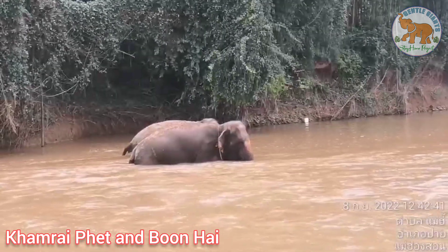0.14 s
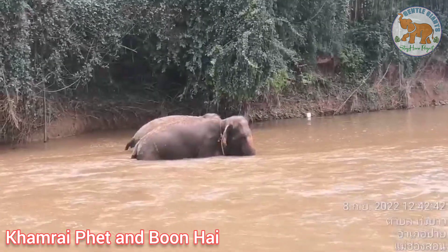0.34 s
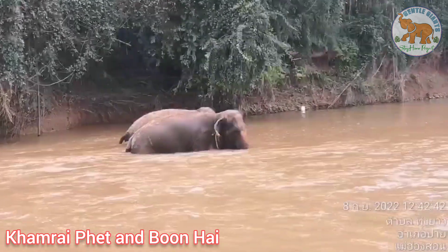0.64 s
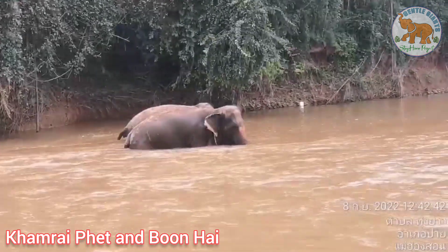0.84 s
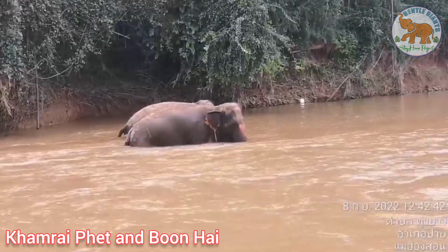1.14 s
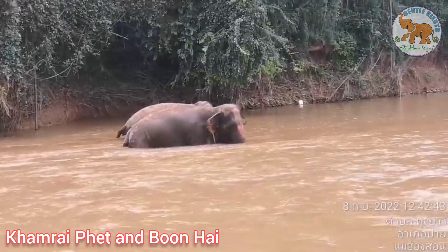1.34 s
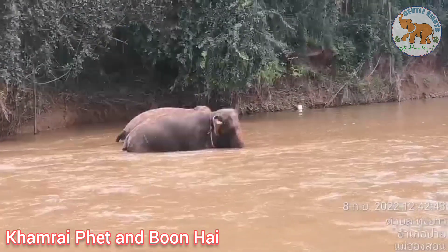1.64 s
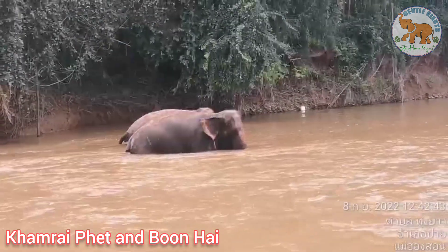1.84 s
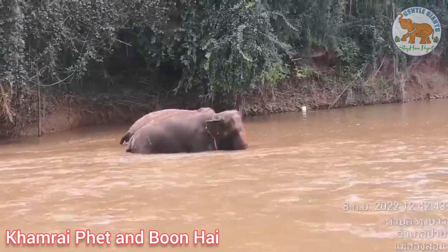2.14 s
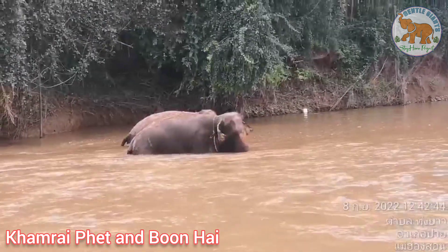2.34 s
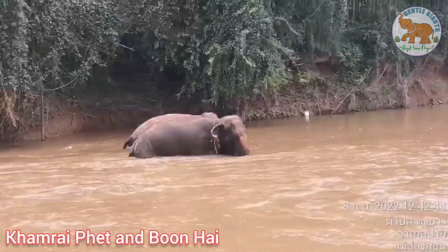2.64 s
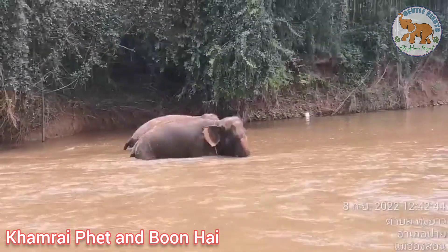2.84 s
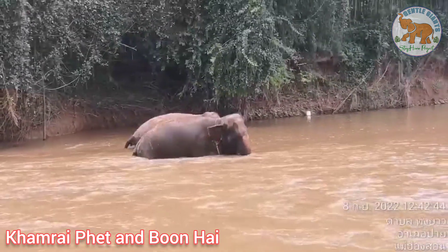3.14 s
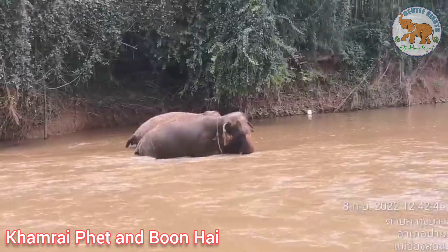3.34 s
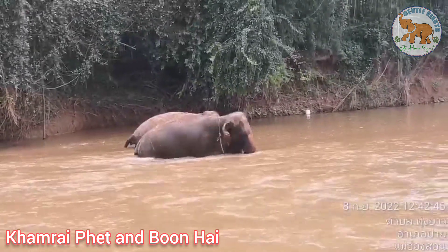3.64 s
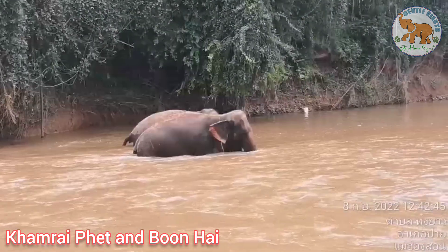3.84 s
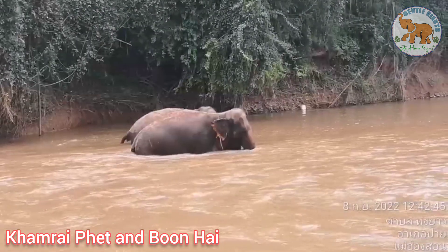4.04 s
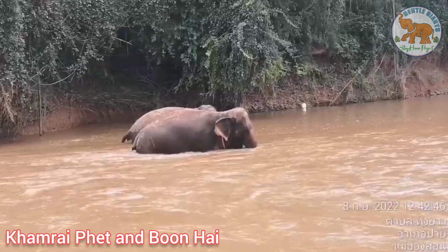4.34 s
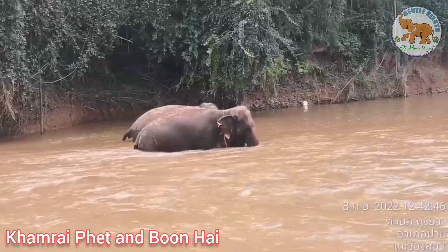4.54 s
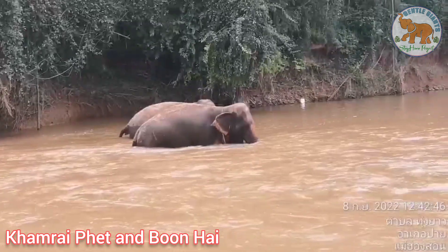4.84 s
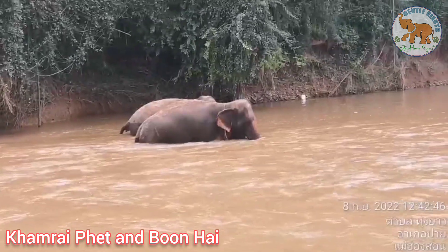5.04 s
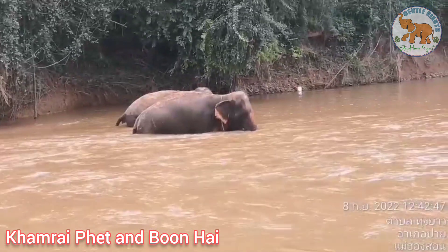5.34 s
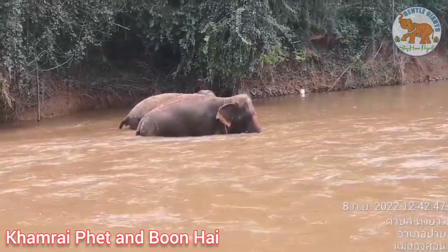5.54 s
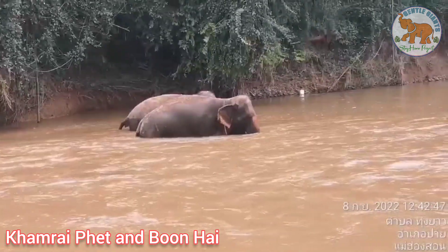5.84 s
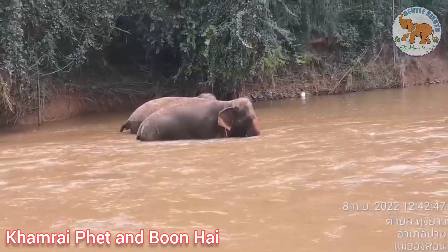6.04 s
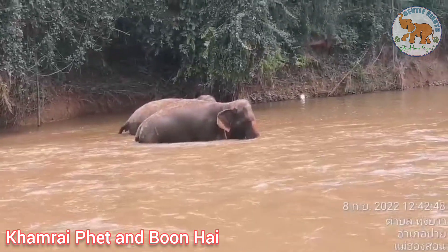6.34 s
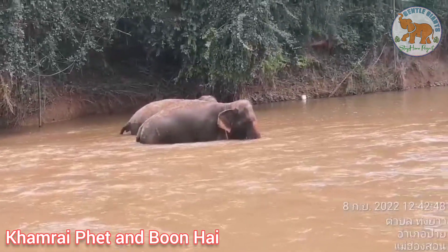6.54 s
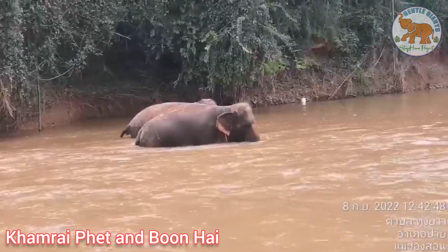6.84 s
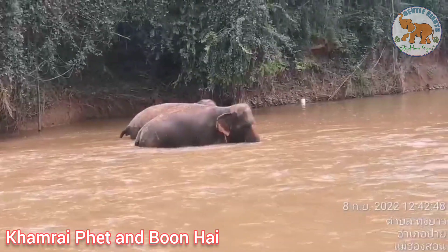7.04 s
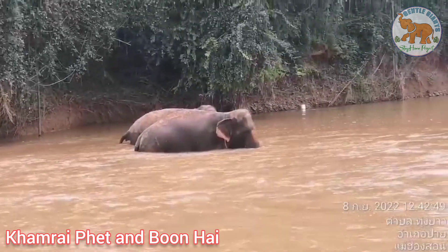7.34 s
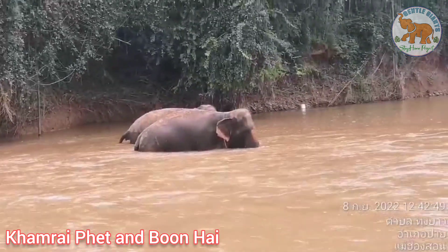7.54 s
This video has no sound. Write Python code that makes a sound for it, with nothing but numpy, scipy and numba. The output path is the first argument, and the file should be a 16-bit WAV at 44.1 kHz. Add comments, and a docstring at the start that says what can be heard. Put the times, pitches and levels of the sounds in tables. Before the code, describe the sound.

Over rushing river water and gusts on the microphone, an elephant growls, roars harshly once, and keeps growling as a second rumble joins.

```python
"""Elephant roaring in a river

From the water's edge: a wading elephant forces a slow, pulsing growl up into a rough roar with a rush
of air, then sinks back to the growl. A second, smoother rumble joins and creeps up in pitch. The wooded
bank echoes them and the river hisses and splashes. Wind buffets the two microphone ports of a phone,
the left one the more sensitive."""
import sys
import numpy as np
from scipy import signal
from scipy.fft import rfft, irfft, next_fast_len
from scipy.io import wavfile
from scipy.ndimage import uniform_filter1d
from numba import njit

SR = 44100
rng = np.random.default_rng(int(sys.argv[2]) if len(sys.argv) > 2 else 0)


def wrap_up_sound(samples):
    """Save the sound to the file named by the first command line argument, as 16-bit audio."""
    columns = np.atleast_2d(samples).T
    # keep every value between -1 and 1, then stretch to whole-number steps
    tamed = np.clip(columns, -1, 1)
    steps = np.round(tamed * 32767).astype(np.int16)
    wavfile.write(sys.argv[1], SR, steps)


N = 339570
TIME = np.arange(N) / SR


# Cavities that ring in the growl. Each row: centre in Hz before TRACT moves it, width in Hz, gain in dB.
CHEST = [(128.8, 29, 18), (199, 50, 6), (283, 40, 5)]
THROAT = [(580, 50, 0)]
LOWER_THROAT = [(302, 59, 0)]
UPPER_THROAT = [(756, 44, 3), (831.6, 15, 0.5), (1120, 360, -21.5), (1395, 63, -18), (1780, 48, -9.5)]
# They move as the elephant strains. Each row: time in seconds, then chest, throat, upper throat in Hz.
TRACT = [(1.6, 99.4, 610, 814), (1.77, 114, 576, 850), (1.9, 132.7, 624, 870), (2.05, 162, 625, 910),
         (3.05, 168.5, 656, 784), (3.2, 130, 664, 752), (3.45, 121.3, 601, 788), (4.4, 132, 628, 770),
         (7.7, 129, 634, 774)]
# Stretches of growling. Each row: start and end in seconds, opening throat level in dB, swell in dB per
# second, then chest, lower throat and upper throat in dB relative to the throat.
GROWLS = [(1.54, 2.053, -59, 25, 15.9, -20, -6.5), (3.014, 3.459, -43.5, -32.5, 12.2, 6, -4),
          (3.333, 4.066, -50.5, -20.5, 17.2, 3.5, -4), (3.98, 5.02, -57, -5, 4.8, -2.5, -7.5),
          (4.92, 7.796, -64, -0.16, 4, 2, -2)]

def growl():
    """Slack folds slap some twenty times a second, unevenly, and ring chest and throat."""
    slaps = folds(beats(), jitter=.02, shimmer_db=2, breath=.42, closing_s=.014)
    chest_hz, throat_hz, upper_hz = curves(TRACT) * (1 + .012 * walk(9))
    throat_shift = throat_hz / THROAT[0][0]
    cavities = [(THROAT, throat_shift), (CHEST, chest_hz / CHEST[0][0]),
                (LOWER_THROAT, throat_shift), (UPPER_THROAT, upper_hz / UPPER_THROAT[0][0])]
    throat, *others = (steady(resonate(slaps, modes, shift), .09) for modes, shift in cavities)
    voice = np.zeros(N)
    for start, end, db, swell_db, *others_db in GROWLS:
        gain = undb(db + swell_db * np.clip(TIME - start, 0, end - start))
        gain *= envelope(start, end, attack_s=.097, release_s=.1)
        voice += gain * (throat + undb(others_db) @ others)
    return lowpass(voice, 2200, order=4)


# The slow beat of the folds. Each row: time in seconds, pulse rate in Hz.
BEAT_RATE = [(1.6, 19), (1.7, 25), (2.08, 26), (2.22, 30), (2.3, 42), (2.8, 39), (2.97, 41), (3.2, 28),
             (3.68, 25), (3.85, 20), (4.4, 18.6), (5.9, 19.8), (7.7, 19.7)]

def beats():
    """Cycles of the slow beat of the folds, pulled into step with every knock and jolt."""
    turns = cycles(curves(BEAT_RATE)[0])
    accents = np.sort([s for s, *_ in KNOCKS + JOLTS])
    offsets = np.unwrap(np.interp(accents, TIME, turns) % 1, period=1)
    return turns - np.interp(TIME, accents, offsets)


# Hard slaps that stand out of the growl. Each row: time in seconds, peak in dB.
KNOCKS = [(1.592, -47.5), (1.644, -44), (1.687, -40.5), (1.804, -46), (1.882, -40), (1.92, -39),
          (1.999, -45), (3.117, -32.5), (3.216, -32), (3.289, -33.5), (3.478, -49), (3.674, -38.5),
          (3.758, -39), (3.802, -40), (3.854, -43), (4.102, -46.5), (4.16, -46), (4.262, -49), (4.366, -45),
          (4.528, -44), (4.799, -45.5), (4.851, -46), (4.952, -42), (5.466, -43), (5.818, -47),
          (5.973, -47), (6.878, -42), (7.242, -42.5), (7.637, -42)]
# The throat's answer to a slap. Each row: centre in Hz, width in Hz, gain in dB.
KNOCK_RING = [(304, 40, 9), (641, 113, 2), (795, 44, -26)]

def knocks():
    """Now and then the folds slap shut hard: a short, broad knock in the throat."""
    ring = resonate(signal.unit_impulse(SR // 10), KNOCK_RING)
    slaps = np.zeros(N)
    for s, db in KNOCKS:
        slaps[int(s * SR)] = undb(db)
    return signal.fftconvolve(slaps, ring / np.abs(ring).max())[:N]


# The roar's fundamental. Each row: time in seconds, pitch in Hz.
ROAR_PITCH = [(1.95, 143), (2.06, 155), (2.14, 174), (2.23, 176), (2.285, 202), (2.37, 185), (2.45, 172),
              (2.485, 188), (2.56, 180), (2.66, 179), (2.71, 189), (2.735, 172), (2.77, 184), (2.885, 186),
              (2.95, 150), (3.02, 132), (3.2, 134)]
# The effort behind it. Each row: time in seconds, level in dB.
EFFORT = [(1.95, -36), (2.04, -33), (2.1, -29), (2.29, -22), (2.39, -24.5), (2.45, -22), (2.56, -23),
          (2.68, -16.5), (2.77, -21), (2.96, -22), (3.06, -28.5), (3.2, -46)]
# The folds lock into a clearer tone. Each row: middle and length in seconds, share of roughness lost.
LOCKS = [(2.287, 0.11, 0.33), (2.55, .2, 0.52), (2.68, 0.11, 0.65), (2.824, 0.19, 0.25), (3.02, .09, 0.35)]
# The voice cracks and turns harsh. Each row: middle and length in seconds, then the rise in dB of the
# overtones, ring, rasp, edge and sizzle.
CRACKS = [(2.045, 0.13, 0.5, 28.5, 21, -5, 10.5), (2.23, 0.37, 2.5, 26, 16.7, 7, 18.5),
          (2.31, 0.11, 5, -7, 2, 0, 3), (2.39, 0.14, 1, -11, 14.7, -21, 0),
          (2.52, 0.2, 4.5, -12, 9.8, 0, -9), (2.639, 0.07, 0, 12, 3, 17, -1),
          (2.735, 0.12, -1, 22, 7.3, 10, 4), (2.83, 0.16, 6.5, 21.5, 1, 15.5, 8)]
# Brief jolts. Each row: start in seconds, rise in dB, further rise of the high resonances in dB.
JOLTS = [(2.038, 5, 2.5), (2.077, -5, 1), (2.216, 3.5, 0), (2.25, 1.5, 3.5), (2.272, 2.5, 1), (2.295, 2, 4),
         (2.355, 1, 1), (2.395, 0.5, 2), (2.474, 2.5, 14.5), (2.522, 1.5, 7), (2.637, 1, 5),
         (2.729, -8.5, 16.5), (2.771, -0.5, 2.5), (2.832, -1, 3.5), (2.888, 2.5, 1), (2.941, 1.5, -5),
         (2.964, 4, -5)]
ROAR_START_S, ROAR_END_S, DULLS_FROM_S, JOLT_S = 1.93, 3.2, 2.8, .018
ROUGHNESS, BEAT_FALL_DB = .833, 7.5  # 0-1 while unlocked; fall within a beat at full roughness
OVERTONE_FADE_DB_PER_S, DULL_DB_PER_S = 6, 14

def roar():
    """Driven hard, the folds swing between a clear tone and chaotic slapping."""
    hz = curves(ROAR_PITCH)[0] * (1 + .013 * walk(22))
    lock = sum(share * swell(s, length) for s, length, share in LOCKS)
    rough = np.clip(ROUGHNESS * (1 - lock), .05, .98)
    clear = np.sqrt(1 - rough ** 2)
    phase = 2 * np.pi * cycles(hz * (1 + .055 * rough * walk(130)))
    flutter = undb(1.2 * rough * walk(110))
    low_tone = clear * steady(flutter * np.sin(2 * phase), .033)
    high_tone = clear * steady(flutter * (np.sin(3 * phase) + np.sin(4 * phase)), .023)
    under = undertone(rough)
    slaps = folds(cycles(.55 * hz), jitter=.22, shimmer_db=3, breath=.98, closing_s=.0067)
    crack_db = sum(np.outer(rises, swell(s, length)) for s, length, *rises in CRACKS)
    overtones_db, *highs_db = crack_db - DULL_DB_PER_S * np.maximum(TIME - DULLS_FROM_S, 0)
    # the overtones fade as the breath runs out and as the folds lock
    overtones_db -= 8.5 + OVERTONE_FADE_DB_PER_S * np.maximum(TIME - ROAR_START_S, 0) + 7.5 * lock
    body = roar_body(low_tone, slaps, rough, hz)
    overtones = undb(overtones_db) * roar_overtones(high_tone, slaps, rough)
    rasp = roar_rasp(slaps, highs_db)
    # the growl's slow beat goes on underneath: each beat starts a burst that dies away
    beat = (beats() + .06 * walk(40)) % 1
    jolt_db, bark_db = sum(np.outer(rises, swell(s + JOLT_S / 2, JOLT_S)) for s, *rises in JOLTS)
    bursts = undb(BEAT_FALL_DB * rough * uniform_filter1d(.45 - beat, size=130) + jolt_db)
    gain = undb(curves(EFFORT)[0]) * envelope(ROAR_START_S, ROAR_END_S, attack_s=.088, release_s=.088)
    return gain * bursts * (body + under + overtones + undb(bark_db) * rasp)


# The roar's low resonances. Each row: centre in Hz at a pitch of 186 Hz, width in Hz, gain in dB.
BODY = [(223, 40, -0.5), (283, 43, 3), (349, 36, 5), (432.7, 25, 1)]

def roar_body(tone, slaps, rough, hz):
    """The second partial, with slaps ringing low resonances that sink as the effort drops."""
    ringing = steady(resonate(slaps, BODY, shift=(hz / 186) ** .627), .1)
    return steady(tone + .75 * rough * ringing, .02)


# The spectrum of the rough overtones. Each row: frequency in Hz, gain in dB.
OVERTONE_COLOUR = [(350, -68.5), (490, -33.5), (545, 4), (595, 6), (670, 1.5), (760, -6.5), (830, -2),
                   (910, -19.5), (1010, -8), (1080, -30), (1150, -27), (2000, -103.5)]
# The mouth's resonance. Each row: time in seconds, centre in Hz.
MOUTH = [(2.2, 549), (2.33, 565), (2.42, 704), (2.5, 744), (2.59, 710), (2.64, 604), (2.72, 590),
         (2.8, 679), (3.1, 637)]

def roar_overtones(tone, slaps, rough):
    """The third and fourth partials and the slaps, lifted where the mouth resonates."""
    source = .99 * tone + np.sqrt(rough) * steady(colour(slaps, OVERTONE_COLOUR), .038)
    return steady(source + 2.95 * band(source, curves(MOUTH)[0], width=23.), .1)


# The roar's high resonances. Each row: centre in Hz, width in Hz, gain in dB.
RING = [(995, 59, 0)]
RASP = [(1327, 83, 12), (1360, 50, 7.5)]
EDGE = [(2220, 130, 1), (2757, 130, 8.3), (3600, 135, 7.1)]
SIZZLE = [(1897, 155, 4), (2886, 104, 5.5), (4570, 1450, -5.5)]
RING_DB, RASP_DB, EDGE_DB, SIZZLE_DB = -48, -44, -47.5, -47  # relative to the body, between cracks

def roar_rasp(slaps, rises_db):
    """High resonances, driven mostly by turbulence, flare when the voice cracks."""
    turbulence = steady(slaps, .11) + 1.95 * rng.standard_normal(N)
    highs = [(RING, RING_DB), (RASP, RASP_DB), (EDGE, EDGE_DB), (SIZZLE, SIZZLE_DB)]
    rasp = sum(undb(db + rise_db) * steady(resonate(turbulence, modes, 1 + .012 * walk(13)), .085)
               for (modes, db), rise_db in zip(highs, rises_db))
    return patchy(rasp, db=2.8, size=2048)


# The tone under the roar. Each row: time in seconds, pitch in Hz, level in dB relative to the body.
UNDERTONE = [(1.95, 145, -2), (2.1, 160.2, -12.5), (2.27, 170.9, -15), (2.47, 214.3, -13),
             (2.55, 202.9, -7), (2.66, 210.2, -16), (2.82, 185, -15.5), (2.95, 199.6, -12),
             (3.1, 136.8, -9)]

def undertone(rough):
    """A second, lower oscillation of the folds, less steady the rougher the roar."""
    hz, db = curves(UNDERTONE)
    gain = np.sqrt(2) * undb(db + 2.5 * walk(45))
    return gain * np.sin(2 * np.pi * cycles(hz * (1 + .09 * rough * walk(110))))


# The spectrum of the breath. Each row: frequency in Hz, gain in dB.
AIR_COLOUR = [(1200, -11), (2200, -9.5), (3300, -9), (4500, -6.5), (5500, -14.5), (6700, -3), (7900, -13.5),
              (8900, 0), (9500, -3.5), (10000, 7), (10700, 2.5), (11500, -12), (12700, -7), (15200, -21.5)]
# Surges as the roar opens and gives way. Each row: middle and length in seconds, rise in dB.
AIR_SURGES = [(2.239, 0.11, 5.5), (2.357, 0.42, 3), (3.043, 0.29, 4.5)]
AIR_DB, AIR_FULL_S, AIR_EASES_S, AIR_SLOPE_DB_PER_S = -48, 2.416, 3.05, 17.5

def rush_of_air():
    """Turbulent air swells with the roar and dies away, pulsing with the beat of the folds."""
    hiss = colour(rng.standard_normal((2, N)) * undb(2 * walk(150) + .092 * walk(24.7)), AIR_COLOUR)
    hiss = patchy(hiss, db=3.2, size=1024)
    fade_db = AIR_SLOPE_DB_PER_S * np.abs(TIME - np.clip(TIME, AIR_FULL_S, AIR_EASES_S))
    surge_db = sum(rise * swell(s, length) for s, length, rise in AIR_SURGES)
    pulse_db = 1.5 * (.5 - beats() % 1)
    onset = np.clip((TIME - GROWLS[0][0]) / .25, 0, 1)
    return ports(hiss, left_db=10.7) * undb(AIR_DB - fade_db + surge_db + pulse_db) * onset


# The second voice. Each row: time in seconds, pulse rate in Hz.
RUMBLE_RATE = [(4.3, 23.2), (4.55, 23.55), (4.75, 23.75), (5.0, 24.25), (5.45, 24.7), (6.0, 24.95),
               (6.5, 25.35), (7.0, 25.6), (7.4, 25.9), (7.7, 26.05)]
# Its partials from the third upward, each a level in dB.
RUMBLE_PARTIALS_DB = [-8, -7, -4, -6, -11.5, -9.5, -13.5, -23, -19, -24.5, -24]
# A nasal resonance moves over them. Each row: time in seconds, centre in Hz, lift in dB.
NASAL = [(4.75, 205, 0), (5.05, 208, 6.5), (5.6, 205, .5), (6.0, 274, 0), (6.3, 276, 3), (7.7, 284, 3)]
# Resonances of its air, rasp and roughness. Each row: centre in Hz, width in Hz, gain in dB.
RUMBLE_AIR = [(663, 44, 5), (754, 36, 1.5), (842, 48, 6.5)]
RUMBLE_RASP = [(2160, 98, 0)]
RUMBLE_ROUGH = [(124.6, 57, 2), (216, 43, -9.5), (304.5, 39, -10)]
RUMBLE_START_S, RUMBLE_ATTACK_S, RUMBLE_DB, RUMBLE_SWELL_DB_PER_S = 4.266, .26, -43.5, 1.6
BRIGHT_ABOVE_HZ, BRIGHT_DB, BRIGHT_S, NASAL_WIDTH_HZ = 245, 9.5, 1.25, 22

def rumble():
    """A low, nasal voice of wavering partials opens brightly; air pulses through its upper resonances."""
    age = np.maximum(TIME - RUMBLE_START_S, 0)
    hz = curves(RUMBLE_RATE)[0] * (1 + .002 * walk(6) + .0026 * walk(22))
    nasal_hz, nasal_db = curves(NASAL)
    turns = cycles(hz)
    bright_db = BRIGHT_DB * np.maximum(1 - age / BRIGHT_S, 0)
    voice = np.zeros(N)
    for k, db in enumerate(RUMBLE_PARTIALS_DB, start=3):
        waver_db = 1.7 * walk(4) + 2 * walk(14)
        phase = 2 * np.pi * k * turns + .8 * rng.standard_normal()
        lift_db = nasal_db * np.exp(-((k * hz - nasal_hz) / NASAL_WIDTH_HZ) ** 2)
        lift_db += bright_db * (k * hz[0] > BRIGHT_ABOVE_HZ)
        voice += np.sqrt(2) * undb(db + waver_db + lift_db) * np.sin(phase)
    puffs = folds(turns, jitter=.06, shimmer_db=2, breath=2.4, closing_s=.008)
    voice += undb(-6.5) * steady(resonate(puffs, RUMBLE_ROUGH), .3)
    air = sum(undb(db + 1.8 * walk(12)) * steady(resonate(puffs, modes), .3)
              for modes, db in [(RUMBLE_AIR, -67.5), (RUMBLE_RASP, -76)])
    swell_db = RUMBLE_SWELL_DB_PER_S * age
    voice *= undb(RUMBLE_DB + swell_db) * np.minimum(age / RUMBLE_ATTACK_S, 1)
    return voice + air * undb(.5 * swell_db) * np.minimum(age, 1)  # the air takes a second to come in


def bank_echo(x, t60, wet_db):
    """The call plus dull echoes scattered by the bank and its trees, partly different at each port."""
    t = TIME[:SR]
    scatter = rng.standard_normal(SR) + .087 * rng.standard_normal((2, SR))
    tail = scatter * undb(-60 * t / t60) * np.clip(t / .028, 0, 1)
    tail /= np.sqrt(np.sum(tail ** 2, axis=1, keepdims=True))
    echo = signal.fftconvolve(x[None], lowpass(tail, 2500, order=1), axes=1)[:, :N]
    return (x + undb(wet_db) * echo) / np.hypot(1, undb(wet_db))


# The river's spectrum at the microphone. Each row: frequency in Hz, gain in dB.
RIVER_COLOUR = [(100, 21), (400, 7.5), (850, 9.5), (1200, 5), (1500, 5), (2000, 7), (2600, 1), (3300, -2),
                (4600, -0.5), (6700, -1), (8000, -1), (10200, 6), (11800, -2.5), (15200, -7)]
RIVER_DB, RIVER_SWELL_DB_PER_S, POPS_PER_S = -58, .24, 500

def river():
    """A restless wash of water with countless tiny bursting bubbles in it."""
    wash = colour(rng.standard_normal((2, N)) * undb(1.85 * walk(45)), RIVER_COLOUR)
    wash = patchy(wash, db=2.6, size=1024)
    pops = (rng.random((2, N)) < POPS_PER_S / SR) * rng.standard_normal((2, N))
    pops *= undb(3 * np.minimum(rng.exponential(size=(2, N)), 3))
    water = wash + undb(-5.5) * colour(pops, RIVER_COLOUR)
    return ports(water, left_db=8) * undb(RIVER_DB + RIVER_SWELL_DB_PER_S * TIME)


# Splashes and drips. Each row: start in seconds, level in dB, centre in Hz, decay in seconds.
SPLASHES = [(.085, -47, 9300, 0.022), (0.281, -58, 6000, 0.022), (.715, -62, 5900, 0.016),
            (.81, -61, 5670, 0.025), (1.2, -52.5, 10100, 0.03), (1.501, -44, 10000, 0.0018),
            (4.69, -51, 7400, 0.0048), (4.801, -50.5, 10500, 0.0066), (5.517, -46, 8000, 0.005),
            (5.723, -47, 9600, 0.003), (5.789, -52.5, 6340, 0.025), (6.109, -56.5, 6640, 0.027),
            (6.469, -50, 10700, .008), (6.807, -44, 9900, 0.0024), (6.991, -54, 6750, 0.058),
            (7.033, -46, 9800, 0.0043), (7.469, -48.5, 6800, 0.027)]

def splashes():
    """Wavelets break: short, grainy bursts of spray."""
    out = np.zeros((2, N))
    size = SR // 5
    t = TIME[:size]
    for s, db, hz, decay in SPLASHES:
        start = int(s * SR)
        gain = undb(db) * np.exp(-t / decay) * (1 - np.exp(-8 * t / decay))
        for side in range(2):
            spray = resonate(rng.standard_normal(size) ** 3, [(hz, .3 * hz, 0)])
            out[side, start:start + size] += (gain * spray / spray.std())[:N - start]
    return ports(out, LEFT_DB)


# Two water plops and one bird's chirp. Each row: start in seconds, level in dB, opening pitch in Hz, decay in
# seconds.
PLOPS_AND_CHIRP = [(4.603, -50, 1100, 0.0058), (5.901, -58, 2380, 0.025), (6.996, -39, 920, 0.0062)]

def plops_and_chirp():
    """Short tones ring briefly and rise in pitch: two plops on the water and, near 5.9 s, a bird's chirp."""
    out = np.zeros(N)
    for s, db, hz, decay in PLOPS_AND_CHIRP:
        t = np.clip(TIME - s, 0, 20 * decay)
        gain = undb(db) * np.exp(-t / decay) * (1 - np.exp(-t / .0012))
        out += gain * np.sin(2 * np.pi * hz * t * (1 + .015 * t / decay))
    return ports(out, LEFT_DB)


# The spectrum of large eddies right at the microphone. Each row: frequency in Hz, gain in dB.
WIND_COLOUR = [(8, -22), (20, 0.5), (42, 4), (70, -0.5), (110, -5), (165, -21.5), (240, -35), (380, -48),
               (800, -71), (2000, -105), (8000, -130)]
# Gusts. Each row: middle and length in seconds, level in dB, left minus right in dB.
GUSTS = [(0.08, 0.18, -36.5, 24), (0.304, 0.21, -33, 19), (0.5, 0.51, -40, 21), (0.98, 0.33, -37.5, 11.5),
         (1.194, 0.14, -34, 6.5), (1.375, 0.22, -32, 13.5), (1.725, 0.64, -36.5, 11.5),
         (2.076, 0.3, -36.5, 21), (2.528, 0.11, -34, 20), (3.045, 0.13, -28, 10.5), (3.29, 0.45, -33, 19),
         (3.603, 0.51, -37, 6), (4.274, 0.073, -32, 13), (4.45, 0.1, -33, -2), (4.648, 0.44, -30.5, 13),
         (5.243, 0.25, -33, 6), (5.54, 0.16, -33, 7), (6.26, 0.45, -31.5, 14), (6.557, 0.97, -31.5, -0.5),
         (6.777, 0.11, -26, 6.5), (7.038, 0.15, -26, 9), (7.227, 0.1, -24, -1.5), (7.407, 0.21, -22, 7),
         (7.624, 0.23, -32.5, -14)]
BREEZE_DB, SMALL_EDDY_PITCH_RATIO, SMALL_EDDY_TAKEOVER_DB = -41, 1.586, (-34.5, -21)

def wind():
    """Eddies press on each port separately; strong wind breaks into smaller, higher-pitched ones."""
    # between gusts the breeze freshens and turns toward the right port
    breeze = ports(undb(BREEZE_DB + .5 * TIME + 2.44 * walk(5.3)), left_db=15 - 1.5 * TIME)
    power = breeze ** 2 + sum(ports(undb(db) * swell(s, length), left_db) ** 2
                              for s, length, db, left_db in GUSTS)
    eddies = []
    for ratio in (1, SMALL_EDDY_PITCH_RATIO):
        pressure = rng.standard_normal((2, N)) * undb(2.5 * walk(30))
        eddies.append(steady(colour(pressure, [(hz * ratio, db) for hz, db in WIND_COLOUR]), .15))
    large, small = eddies
    small_share = np.interp(10 * np.log10(power), SMALL_EDDY_TAKEOVER_DB, [0, 1])
    return large * np.sqrt(power * (1 - small_share)) + small * np.sqrt(power * small_share)


# Sharp hits of wind. Each row: start in seconds, level in dB, rise time in seconds.
BUFFETS = [(0.272, -27, .0018), (1.177, -29, .002), (3.599, -25, .002), (4.575, -25, .0025),
           (5.324, -26, .0021), (6.461, -23, .0009), (6.72, -23.5, .0013), (6.776, -26, .002),
           (7.024, -24, .001), (7.425, -20, .0014), (7.66, -24, .0012)]

def buffets():
    """Now and then an eddy hits the microphone with a thump, mostly on the left."""
    thumps = np.zeros(N)
    for s, db, rise in BUFFETS:
        progress = np.clip((TIME - s) / rise, 0, 60)
        thumps += undb(db) * progress * np.exp(1 - progress)
    return ports(lowpass(thumps, 530, order=4), left_db=15)


def folds(turns, jitter, shimmer_db, breath, closing_s):
    """Vocal folds: one uneven pulse a cycle, each followed by a puff of turbulence."""
    count = int(turns[-1])
    timing, strength = rng.standard_normal((count, 2)).T
    at = np.interp(np.arange(count) + jitter * timing, turns, np.arange(N)).astype(int)
    pulses = np.zeros(N)
    pulses[at] = undb(shimmer_db * strength)
    pole = np.exp(-1 / (closing_s * SR))
    puffs = signal.lfilter([np.sqrt(1 - pole ** 2)], [1, -pole], pulses)
    return pulses + breath * puffs * rng.standard_normal(N)


def ports(x, left_db):
    """Share a sound between the two microphone ports, keeping their mean."""
    ratio = undb(left_db) * np.ones(N)
    return x * 2 * np.array([ratio, np.ones(N)]) / (1 + ratio)


def resonate(x, modes, shift=1):
    """Steep resonances (Hz, width in Hz, dB), their centres multiplied by shift."""
    shift = shift * np.ones(len(x))
    return sum(undb(db) * band(band(x, hz * shift, float(width)), hz * shift, float(width))
               for hz, width, db in modes)


@njit
def band(x, hz, width):
    """State-variable band-pass with a moving centre."""
    y, band_state, low_state = np.empty(len(x)), 0., 0.
    for i in range(len(x)):
        g, damping = np.tan(np.pi * hz[i] / SR), width / hz[i]
        v = (band_state + g * (x[i] - low_state)) / (1 + g * (g + damping))
        band_state, low_state = 2 * v - band_state, low_state + 2 * g * v
        y[i] = damping * v
    return y


def colour(x, points):
    """Causal filter through (Hz, dB) points; the result has unit rms."""
    hz, db = np.transpose(points)
    size = next_fast_len(N + SR // 2)
    size += size % 2
    f = np.maximum(np.fft.rfftfreq(size, 1 / SR), 1)
    cepstrum = irfft(np.log(undb(np.interp(np.log(f), np.log(hz), db))))
    cepstrum[1:size // 2] *= 2  # folded for minimum phase
    cepstrum[size // 2 + 1:] = 0
    y = irfft(rfft(x, size) * np.exp(rfft(cepstrum)))[..., :N]
    return y / y.std()


def lowpass(x, hz, order):
    """Roll off the treble above hz."""
    return signal.sosfilt(signal.butter(order, hz, fs=SR, output="sos"), x)


def patchy(x, db, size):
    """Let every narrow band swell and fade on its own, in frames of size samples."""
    frames = signal.stft(x, nperseg=size)[2]
    drift = uniform_filter1d(rng.standard_normal(frames.shape), size=5, axis=-2)
    drift = uniform_filter1d(drift, size=3, axis=-1)
    return signal.istft(frames * undb(db * drift / drift.std()), nperseg=size)[1][..., :N]


def steady(x, span):
    """Unit rms over every stretch of span seconds."""
    size = max(int(span * SR), 8)
    power = uniform_filter1d(uniform_filter1d(x ** 2, size), size)
    return x / np.sqrt(np.abs(power) + 1e-6 * np.mean(x ** 2))


def walk(rate):
    """Smooth random drift that changes rate times a second; spread 1."""
    size = max(int(SR / rate), 2)
    drift = uniform_filter1d(np.repeat(rng.standard_normal(N // size + 1), size), size)[:N]
    return drift / drift.std()


def envelope(start, end, attack_s, release_s):
    """Attack, hold at one, release."""
    return np.clip(np.minimum((TIME - start) / attack_s, (end - TIME) / release_s), 0, 1)


def swell(middle, length):
    """A smooth rise to one and back."""
    return np.cos(np.pi * np.clip((TIME - middle) / length, -.5, .5))


def curves(table):
    """Each column of a table of (seconds, ..) rows, sample by sample."""
    s, *columns = np.transpose(table)
    return [np.interp(TIME, s, column) for column in columns]


def cycles(hz):
    """Cycles completed so far at a changing rate."""
    return np.cumsum(hz) / SR


def undb(db):
    """Decibels to gain."""
    return 10 ** (np.asarray(db) / 20)


LEFT_DB, LEFT_LAG_S = 8.5, .00007  # the left port is more sensitive, and the calls reach it later

def scene():
    """Both voices over river and wind; the low calls reach the microphone more by way of the bank."""
    growling = bank_echo(growl() + knocks(), t60=.28, wet_db=-6.5)
    roaring = bank_echo(roar(), t60=.5, wet_db=-14)
    rumbling = bank_echo(rumble(), t60=.25, wet_db=-11)
    left, right = growling + roaring + rumbling
    voices = np.array([np.interp(TIME - LEFT_LAG_S, TIME, left), right])
    return ports(voices, LEFT_DB) + rush_of_air() + river() + splashes() + plops_and_chirp() + wind() + buffets()


def record(dry):
    """The phone cuts the treble steeply above 15250 Hz."""
    return signal.sosfilt(signal.ellip(10, .2, 80, 15250, fs=SR, output="sos"), dry)


dry = scene()
out = record(dry)
wrap_up_sound(out)
```